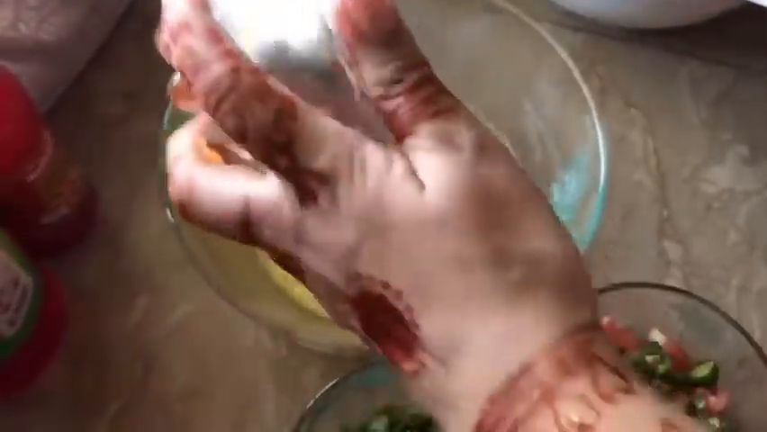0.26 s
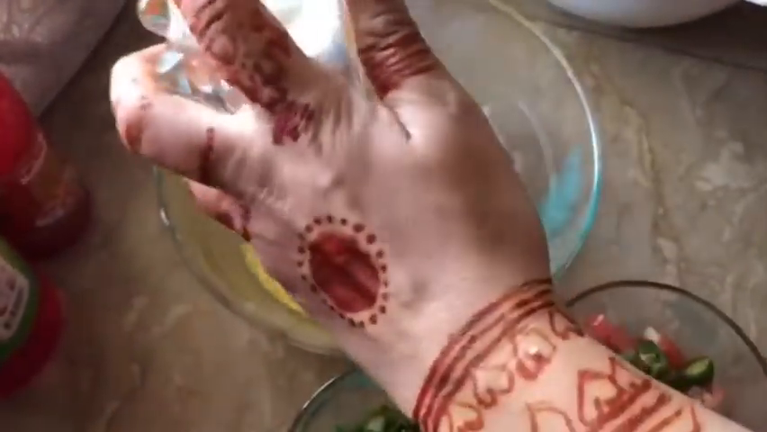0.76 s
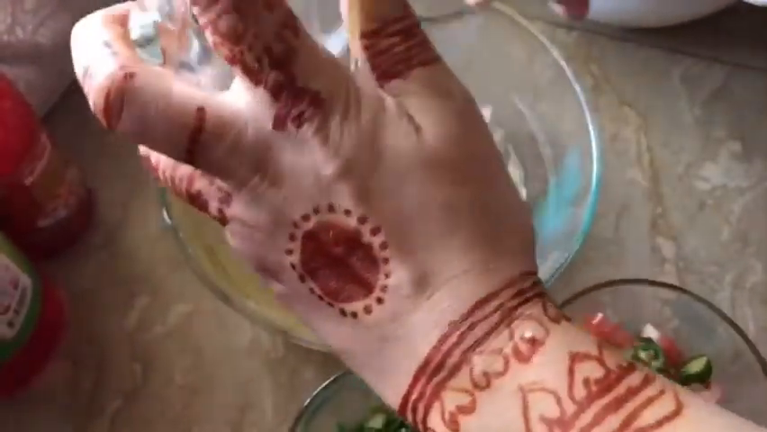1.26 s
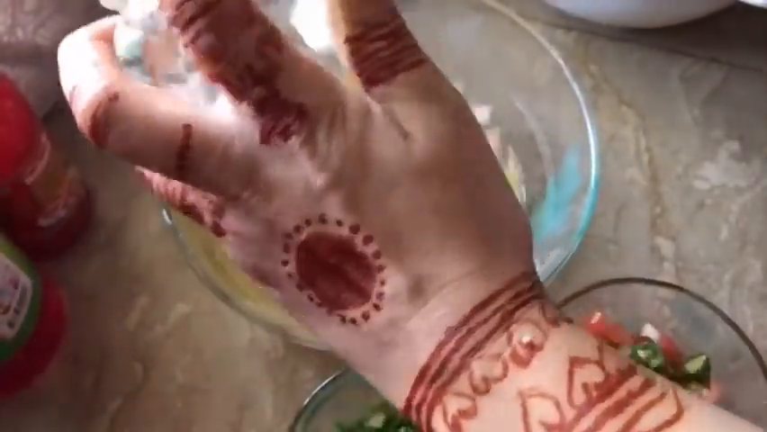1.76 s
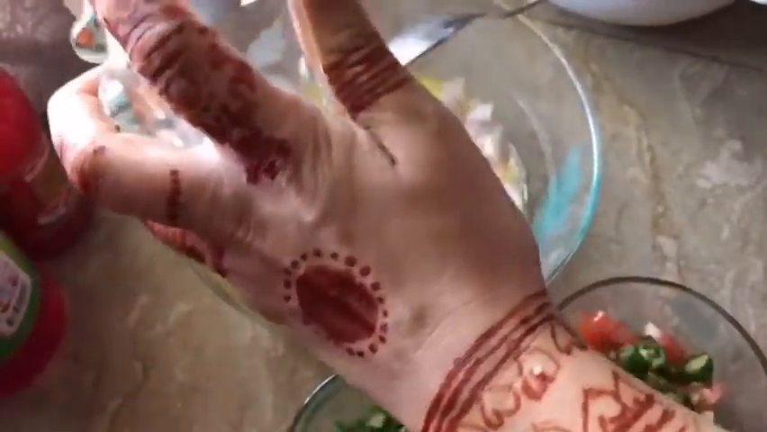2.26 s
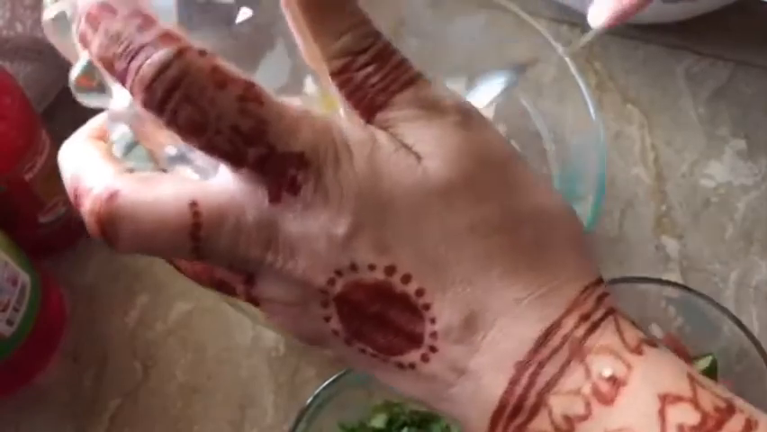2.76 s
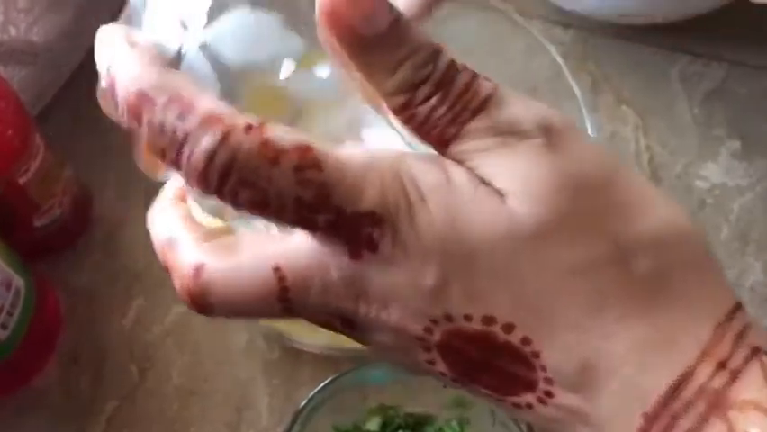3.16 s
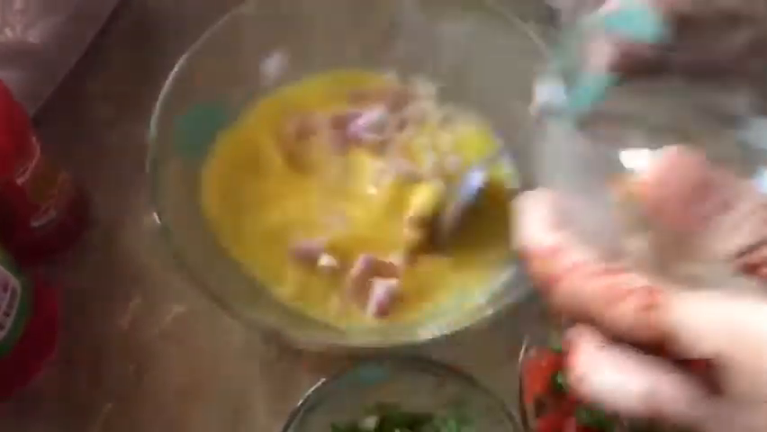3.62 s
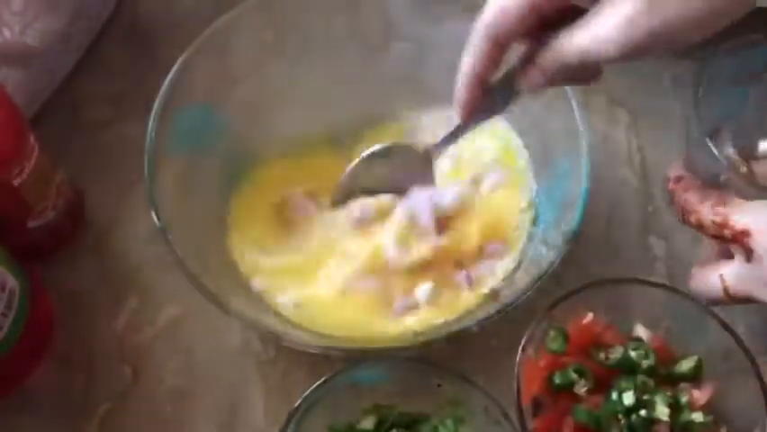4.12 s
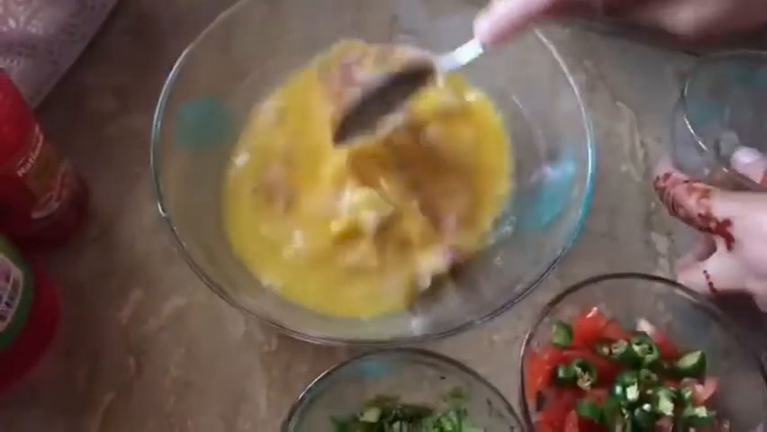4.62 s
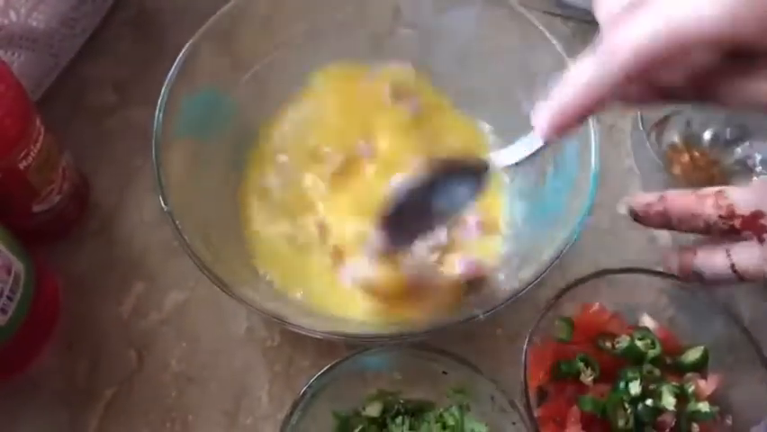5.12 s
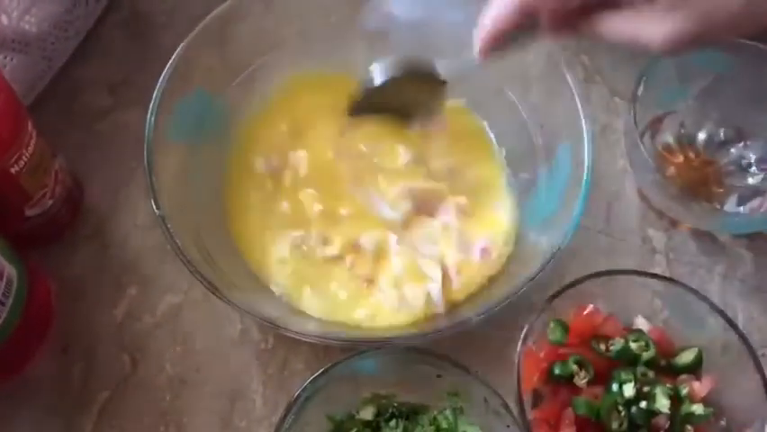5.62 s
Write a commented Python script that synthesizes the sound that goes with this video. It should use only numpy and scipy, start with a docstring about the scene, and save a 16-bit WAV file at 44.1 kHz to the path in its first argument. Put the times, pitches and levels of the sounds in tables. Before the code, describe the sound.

In a small kitchen, a steel spoon scrapes out a hand-held glass dish with sharp, irregular clinks, each ringing briefly, and a few tiny squeaks. After a pause of about a second with only faint bumps, the spoon stirs beaten egg in a glass bowl: hollower clacks, wet dragging and soft sloshing, with light thuds from the worktop. The microphone is close, over faint room hiss and a low rumble.

```python
"""A small kitchen, one microphone close to the worktop, over a low rumble and the hiss of room air.
A steel spoon scrapes a small hand-held glass dish empty over a mixing bowl, then stirs beaten egg in it.
Each blow is a short clack of spoon and damped glass; the dish rim or the bowl wall rings on and the
worktop thuds. Between blows the spoon grazes, drags and squeaks on wet glass, and the egg sloshes."""
import sys
import numpy as np
from scipy import signal
from scipy.fft import rfft, irfft
from scipy.io import wavfile

SR = 44100
rng = np.random.default_rng(int(sys.argv[2]) if len(sys.argv) > 2 else 0)


def inscribe(sig):
    """Save sig as 16-bit PCM at rate SR to the path in sys.argv[1].

    A 1-D sig is mono; a 2-D sig holds one channel per row.
    Samples are clipped to [-1, 1] before scaling.
    """
    pcm = np.round(np.clip(np.atleast_2d(sig).T, -1, 1) * 32767)
    wavfile.write(sys.argv[1], SR, pcm.astype(np.int16))


N = 259413


def amp(db):
    """Gain of a dB value."""
    return 10 ** (np.asarray(db) / 20)


def rms_one(x):
    """Scaled to rms 1."""
    return x / np.sqrt(np.mean(x ** 2) + 1e-20)


def in_time(rows):
    """Columns of a curve, one value a sample."""
    times_s, *columns = np.transpose(rows)
    return [np.interp(np.arange(N) / SR, times_s, column) for column in columns]


def at_hz(hz, points_hz, values):
    """Reads a spectrum on a log frequency axis."""
    return np.interp(np.log(hz), np.log(points_hz), values)


def band(x, low_hz, high_hz):
    """Band-pass."""
    return signal.sosfilt(signal.butter(2, [low_hz, high_hz], "band", fs=SR, output="sos"), x)


def add(out, start_s, sound):
    """Mixes a sound in at its start time."""
    i = round(start_s * SR)
    out[i:i + len(sound)] += sound[:N - i]


def rings(hz, level_db, t60, rise_ms):
    """Modes set off together with alternating signs: sines that swell during contact, then die away."""
    t = np.arange(int(max(t60) * SR * 3 // 4))[:, None] / SR
    signs = (-1) ** np.arange(len(hz))
    modes = np.exp(-np.log(1000) * t / t60) * np.sin(2 * np.pi * hz * t)
    swell = 1 - np.exp(-t[:, 0] * 1000 / max(rise_ms, .05))
    return modes @ (signs * amp(level_db)) * swell


# spectrum of the room air: frequency_hz, density_db
ROOM_AIR = [(18, -43.5), (30, -8.5), (102, -7.5), (169, -2.5), (274, 0.5), (571, -11.5), (950, -14.5),
            (1130, -19), (1220, -15.5), (1890, -18), (3940, -22), (11200, -27), (13000, -44)]
# low rumble in the room: time_s, level_db
RUMBLE = [(0.0, -69), (3.88, -68), (4.68, -63.5), (5.88, -67.5)]


def background():
    """Steady room air over a low rumble that swells a little."""
    hz = np.fft.rfftfreq(N, 1 / SR) + 1
    air = irfft(rfft(rng.standard_normal(N)) * amp(at_hz(hz, *np.transpose(ROOM_AIR))), N)
    rumble = band(rng.standard_normal(N), 46, 125)
    rumble_db, = in_time(RUMBLE)
    return amp(-68.5) * rms_one(air) + amp(rumble_db) * rms_one(rumble)


# decay of the kitchen around the microphone: frequency_hz, t60_s
KITCHEN_DECAY = [(100, .3), (500, 0.35), (1500, .28), (4000, 0.26), (8000, 0.22), (12000, 0.11)]


def kitchen(direct, level_db=-11):
    """Dense reflections: half-octave noise bands, each dying at its own rate."""
    t, edges_hz = np.arange(SR // 2) / SR, 90 * 2 ** np.arange(0, 7.6, .5)
    tail = np.zeros(len(t))
    for low, high in zip(edges_hz, edges_hz[1:]):
        t60 = at_hz(np.sqrt(low * high), *np.transpose(KITCHEN_DECAY))
        tail += band(rng.standard_normal(len(t)), low, high) * amp(-60 * t / t60)
    tail *= 1 - np.exp(-t / 0.00067)   # reflections build up
    return amp(level_db) * signal.fftconvolve(direct, tail / np.sqrt(np.sum(tail ** 2)))[:N]


# modes of the worktop under the bowl: pitch_hz, level_db, t60_s
WORKTOP_MODES = [(71.7, -9, 0.2), (94, -11.5, 0.43), (212, -1.5, 0.19), (283.8, 1, 0.093)]


def worktop_thuds():
    """Blows shake the worktop, soft heavy ones on the bowl most; it swells just after the contact."""
    out, thud = np.zeros(N), rings(*np.transpose(WORKTOP_MODES), rise_ms=4.8)
    for start_s, level_db, softness, *_ in BOWL_BLOWS:
        colour_db, _ = blow(level_db, softness, 0, 0, *BOWL_TOUCH)
        add(out, start_s, amp(colour_db[0]) * thud)   # driven by the lowest band of the blow
    for start_s, level_db, *_ in DISH_BLOWS:
        add(out, start_s, amp(level_db - 44.5) * thud)
    return out


def egg_slosh(rise_s=0.005, t60_s=0.35):
    """Egg thrown against the wall: lumpy dull noise that swells after each bowl blow and dies away."""
    swell, t = np.zeros(N), np.arange(SR // 2) / SR
    envelope = amp(-60 * t / t60_s) * (1 - np.exp(-t / rise_s))
    for start_s, level_db, softness, *_ in BOWL_BLOWS:
        slosh_db = level_db - 41.5 + 17.5 * softness   # softer blows move more egg
        add(swell, start_s, amp(slosh_db) * envelope)
    lumps = amp(1.4 * rms_one(band(rng.standard_normal(N), 30, 150)))
    return swell * rms_one(band(lumps * rng.standard_normal(N), 470, 1570))


# pressure of the spoon dragging on glass, heard as level: time_s, level_db
DRAG_PRESSURE = [(0, -79), (.3, -64.5), (.45, -76.5), (.56, -61), (.95, -66.5), (1.15, -63), (1.44, -63),
                 (1.55, -76), (1.9, -74.5), (2.2, -64.5), (2.4, -85.5), (2.62, -58.5), (2.78, -75.5),
                 (3.9, -83.5), (4.13, -58.5), (4.18, -75), (4.45, -68.5), (4.7, -54.5), (5.1, -56.5),
                 (5.35, -72.5), (5.65, -74.5), (5.88, -52.5)]


def spoon_drag(slips_per_s=2500):
    """Dense tiny slips through egg and onion, heard directly and through the damped modes and the rim."""
    catching = amp(3 * rms_one(band(rng.standard_normal(N), 4, 16)))   # the spoon catches and lets go
    slipping = rng.random(N) < slips_per_s / SR
    slips = catching * slipping * amp(2.3 * rng.exponential(1, N)) * rng.choice([-1, 1], N)
    hz, mode_db, t60 = np.transpose(CLACK_MODES)
    glass = signal.fftconvolve(slips, rings(hz, mode_db, t60 * 0.18, rise_ms=0.14))[:N] + amp(15) * slips
    hz, mode_db, t60 = np.transpose(RIM_MODES)
    rim = signal.fftconvolve(slips, rings(hz, mode_db, t60 * .4, rise_ms=.1))[:N]
    dull = rms_one(band(glass, 370, 1900))
    bright = rms_one(band(glass, 2200, 6700)) + amp(-6) * rms_one(rim)
    level_db, = in_time(DRAG_PRESSURE)
    bare_glass, sunk_in_egg = (4.27, -1.5, 0), (4.49, -2, -22.5)   # time_s, dull_db, bright_db
    dull_db, bright_db = in_time([bare_glass, sunk_in_egg])
    return amp(level_db) * (amp(dull_db) * dull + amp(bright_db) * bright)


# the edge of the spoon along wet glass: start_s, level_db, pitch_hz, length_s
SQUEAKS = [(1.298, -51, 2700, .03), (1.325, -47, 2100, 0.019), (1.41, -59.5, 3430, 0.027),
           (4.08, -42.5, 1106, 0.042), (5.845, -49, 1270, 0.025)]


def squeaks(half_width=.08):
    """Short swells of friction noise in one narrow resonance."""
    out = np.zeros(N)
    for start_s, level_db, pitch_hz, length_s in SQUEAKS:
        rub = band(rng.standard_normal(4096), pitch_hz * (1 - half_width), pitch_hz * (1 + half_width))
        rub = rms_one(rub[1024:])
        swell = np.sin(np.pi * np.minimum(np.arange(len(rub)) / SR / length_s, 1))
        add(out, start_s, amp(level_db) * rub * swell)
    return out


# light grazes, bumps and wet smacks: start_s, level_db, centre_hz
GRAZES = [(.005, -42, 384), (0.289, -58, 1100), (0.465, -43.5, 5300), (0.533, -54.5, 1490),
          (0.549, -55.5, 6450), (1.159, -53, 6860), (1.176, -44.5, 1640), (1.291, -56, 9000),
          (1.369, -57.5, 9200), (1.447, -41, 1213), (1.553, -52.5, 4200), (1.719, -50.5, 8300),
          (3.322, -60.5, 4450), (3.576, -48, 709), (3.641, -52, 316), (3.779, -39, 233),
          (4.424, -55.5, 6980), (4.441, -56, 2900), (4.492, -61.5, 3700), (5.227, -56, 6970),
          (5.246, -45.5, 6100)]


def grazes():
    """A light, soft touch: a faint clack centred on one region; the lower, the slower."""
    out, octaves = np.zeros(N), np.linspace(-2, 2, 9)
    for start_s, level_db, centre_hz in GRAZES:
        contact_ms = 3.0 * (2000 / centre_hz) ** 0.47
        add(out, start_s, clack(centre_hz * 2 ** octaves, level_db - 12 * octaves ** 2, contact_ms))
    return out


# modes of spoon and damped glass, shortened in each clack or slip: pitch_hz, level_db, base_t60_s
CLACK_MODES = [(380, -7, 0.049), (622, -14, 0.1), (832, -12.5, 0.099), (924, -11, 0.062), (1150, -1, 0.054),
               (1350, -11.5, 0.043), (1633, -3, 0.024), (2052, -6, 0.039), (2426, -5.5, 0.046),
               (2654, -9.5, 0.078), (2910, -5, 0.057), (3226, -0.5, 0.035), (3688, -4, 0.054),
               (4086, -3, 0.039), (4380, -9, .05), (4610, -13.5, 0.048), (5245, -16.5, .04),
               (5645, -11.5, 0.0077), (6280, -9, 0.047), (6780, -10.5, 0.042), (7190, -9, 0.034),
               (8130, -8, 0.045), (8890, -6, 0.055), (9520, -2.5, 0.043), (11200, -8.5, 0.06),
               (12300, -24.5, 0.028)]


def clack(points_hz, colour_db, contact_ms, scatter_db=4.5):
    """Short modes of scattered strength, and noisy chatter that fades with the contact time."""
    hz, mode_db, t60 = np.transpose(CLACK_MODES)
    level_db = mode_db + at_hz(hz, points_hz, colour_db) + scatter_db * rng.standard_normal(len(hz))
    shifted_hz = hz * (1 + 0.011 * rng.standard_normal(len(hz)))   # grip and load shift the modes
    body = rings(shifted_hz, level_db, t60 * 0.77, rise_ms=contact_ms / 6)
    chatter_db = 9 + at_hz(np.fft.rfftfreq(4096, 1 / SR) + 1, points_hz, colour_db)
    chatter = irfft(rfft(rng.standard_normal(4096)) * amp(chatter_db))
    contacts = np.arange(4096) / SR * 1000 / max(contact_ms, .2)   # time in contact lengths
    sound = chatter * (1 - np.exp(-6 * contacts)) * np.exp(-contacts / 1.415)
    add(sound, 0, body[:4096])
    return sound


# points at which the colour of a blow is set: frequency_hz
COLOUR_HZ = [300, 1000, 2400, 4300, 7000, 10500]


def blow(level_db, softness, knock_db, bite_db, hard_db, soft_db, hard_ms, soft_ms):
    """Colour and contact time of a blow lie between those of a hard (0) and a soft (1) one."""
    colour_db = level_db + (1 - softness) * np.array(hard_db) + softness * np.array(soft_db)
    colour_db += knock_db * np.array([0, 1, 0, 0, 0, 0])   # hollow knock near 1 kHz
    colour_db += bite_db * np.array([0, 0, .7, 1, 0, 0])   # bite at 2.4 to 4.3 kHz
    return colour_db, (1 - softness) * hard_ms + softness * soft_ms


# contact with the bowl: hard_db and soft_db at each COLOUR_HZ, hard_ms, soft_ms
BOWL_TOUCH = [-42.5, -13, -22.5, -20, -16, -25], [-18.5, -9, -22.5, -44.5, -47, -78], 2.14, 5.1
# low modes of the bowl wall: pitch_hz, level_db, base_t60_s
WALL_MODES = [(508.3, -23.5, 0.67), (1128.3, -18, 0.98), (2010, -24.5, .35)]
# spoon on the bowl: start_s, level_db, softness, knock_db, bite_db, wall_db, t60_factor
BOWL_BLOWS = [(2.9956, -3.5, 0.23, 1, 2, -21.5, 0.88), (3.998, -5.5, 0, -8, 5, -26, 0.64),
              (4.527, -3, 0.12, -5, -3.5, -30, .35), (4.658, -15, 0.86, 1, -1.3, -23.5, 0.55),
              (4.842, -31, 1, 11.5, -4, -27.5, 0.43), (4.944, -8, 0.04, 2.5, -1.5, -34, 0.46),
              (5.032, -11.5, 0.81, -1, 7, -38, 0.57), (5.055, -26, 0.64, 5.5, 5, -15, 0.66),
              (5.285, -42, 0.75, 2.5, -3, -6.5, 1.37), (5.6929, -2, 0, -1.7, -5, -30, 0.42),
              (5.823, -36, 0.3, 15, .1, -22, .65)]


def spoon_on_bowl():
    """The egg muffles the bowl: mostly clack, a few low modes ring on."""
    out, (hz, mode_db, t60) = np.zeros(N), np.transpose(WALL_MODES)
    for start_s, level_db, softness, knock_db, bite_db, wall_db, t60_factor in BOWL_BLOWS:
        colour_db, contact_ms = blow(level_db, softness, knock_db, bite_db, *BOWL_TOUCH)
        add(out, start_s, clack(COLOUR_HZ, colour_db, contact_ms))
        add(out, start_s, rings(hz, mode_db + level_db + wall_db, t60 * t60_factor, contact_ms))
    return out


# contact with the dish: hard_db and soft_db at each COLOUR_HZ, hard_ms, soft_ms
DISH_TOUCH = [-47.5, -24.5, -23.5, -19, -17, -27], [-33, -28, -10.5, -21, -30.5, -38], 2.6, 2.1
# split modes of the dish rim: pitch_hz, level_db, base_t60_s
RIM_MODES = [(1574, -2.5, .16), (1604, -13, 0.3), (3381, -6, 0.33), (3439, -9.5, 0.46), (3493, -13.5, 0.08),
             (5687, -2, 0.16), (5753, -7.5, 0.28), (5840, -7, .29), (8286, -6.5, 0.18), (8430, -9.5, .17),
             (8640, -5, .21)]
# the dish struck or jolted above the bowl: start_s, level_db, softness, knock_db, bite_db,
# ring_db, tilt_db_per_octave, bend_db_per_octave_squared, t60_factor
DISH_BLOWS = [(0.1493, -8, 0, -2.5, -0.5, -14, -5, -8, 0.15),
              (0.3339, -31.5, 0.78, 7.5, 0.7, -39, 1, 13, 0.26),
              (0.6387, -7, 0.02, 8.5, 2, -30, 2, 7.5, 0.22), (0.735, -38.5, 0.6, 32, -9, -30, -3, 9, .38),
              (0.7782, -4.5, .3, 12.5, 7.5, -44, 3, -2, .56), (1.0066, -6, 0, 0, 0, -8.5, -5, 3, .19),
              (1.0398, -15, 0.3, 15.5, 0.5, -37, 0, -6, .35),
              (1.052, -7.5, 0.26, 0, -1.5, -12, -4, -1.5, .15),
              (1.1404, -30.5, .7, 11, 0, -15.5, 0, -6.5, 0.44),
              (1.6056, -4, 0.38, 5.5, 3, -5, -1, -9.5, 0.23), (1.967, -4, 0, -15.5, 2, -17, -3.5, 2, 0.37),
              (1.9765, -8.5, 0.6, 8, 0, -17, -2, 3, 0.43), (1.9847, -19.5, .05, -5, -11, -9, 2, 2, 0.32),
              (2.0592, -22, 1, 6, -2, -11, -5, -1, 0.21), (2.175, -24, 0.58, -15, 2.5, -16, 0, -9, 0.26),
              (2.2644, -18, 0.46, -21, -1.5, -9, -1, -6.5, 0.17),
              (2.5592, -0.5, 0.35, -2.5, -2.5, -15, -4.5, 3, 0.22),
              (2.5801, -8.5, 0.2, -5.5, -2.5, -19.5, 5.5, 3, .16),
              (2.6391, -25, 0, -10, 6.5, -18, 8, -5, 0.46), (5.0317, -20.5, 1, 22, .1, -23, -3, -6, 0.61)]


def spoon_on_dish(rim_middle_hz=3400, damping_db=-5.5, scatter_db=3.5, free_ring_db=-23.5):
    """Where the spoon lands sets each rim mode's strength; the grip shortens the ring, a touch damps it."""
    out, (hz, mode_db, t60) = np.zeros(N), np.transpose(RIM_MODES)
    octaves = np.log2(hz / rim_middle_hz)
    for start_s, level_db, softness, knock_db, bite_db, ring_db, tilt, bend, t60_factor in DISH_BLOWS:
        colour_db, contact_ms = blow(level_db, softness, knock_db, bite_db, *DISH_TOUCH)
        still_ringing = out[round(start_s * SR):][:SR // 2]
        still_ringing *= amp(damping_db * np.minimum(np.arange(len(still_ringing)) / SR / 0.0051, 1))
        rim_db = mode_db + level_db + ring_db + tilt * octaves + bend * octaves ** 2
        rim_db += scatter_db * rng.standard_normal(len(hz))
        gripped = rings(hz, rim_db, t60 * t60_factor, contact_ms / 6)
        free = rings(hz, rim_db + free_ring_db, t60 * 1.3, contact_ms / 6)   # what the fingers miss
        for sound in gripped, free, clack(COLOUR_HZ, colour_db, contact_ms):
            add(out, start_s, sound)
    return out


def scene():
    """The close sounds and the kitchen behind them, at one microphone, alike in both channels."""
    spoon = spoon_on_dish() + spoon_on_bowl() + grazes() + squeaks() + egg_slosh()
    mono = spoon + kitchen(spoon) + worktop_thuds() + spoon_drag() + background()
    return np.array([mono, mono])


def record(dry, gain_db=4, low_cut_hz=45, top_hz=13300):
    """The small microphone drops the deep bass; peaks are rounded, the top is cut."""
    thin = amp(gain_db) * signal.sosfilt(signal.butter(2, low_cut_hz, "high", fs=SR, output="sos"), dry)
    rounded = .9 * np.tanh(thin / .9)
    return signal.sosfilt(signal.cheby2(12, 60, top_hz, fs=SR, output="sos"), rounded)


dry = scene()
out = record(dry)
inscribe(out)
```